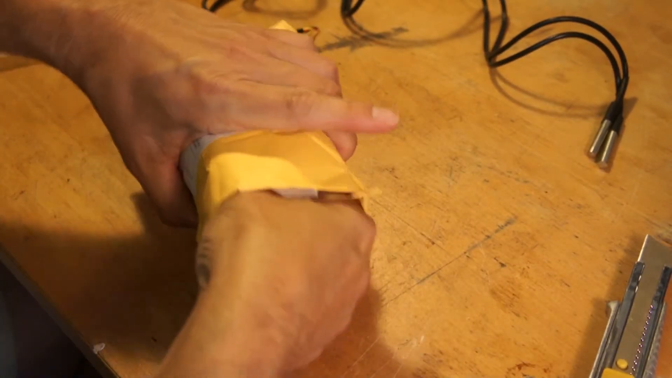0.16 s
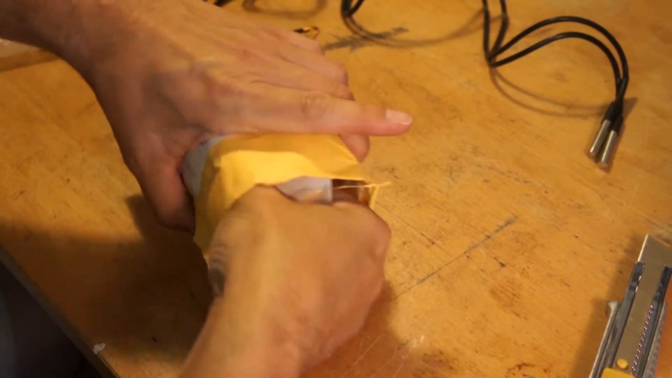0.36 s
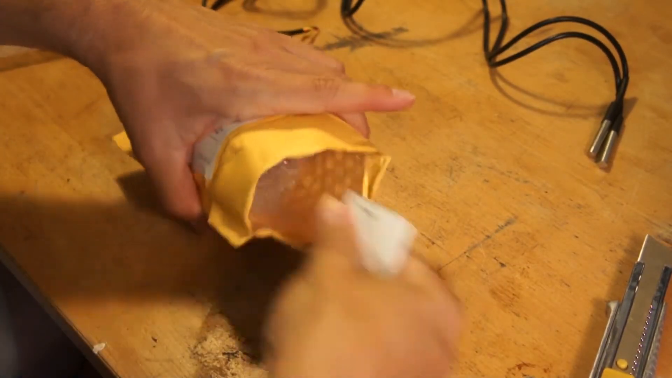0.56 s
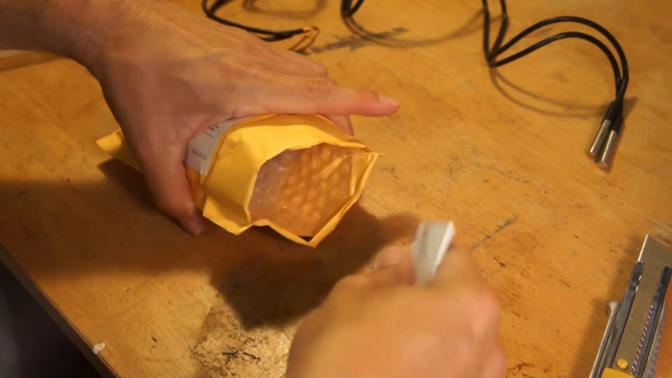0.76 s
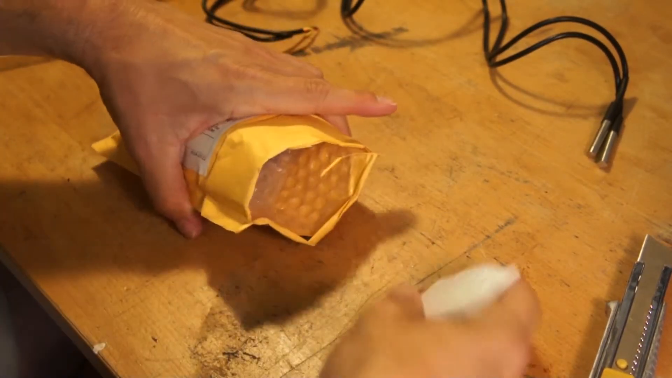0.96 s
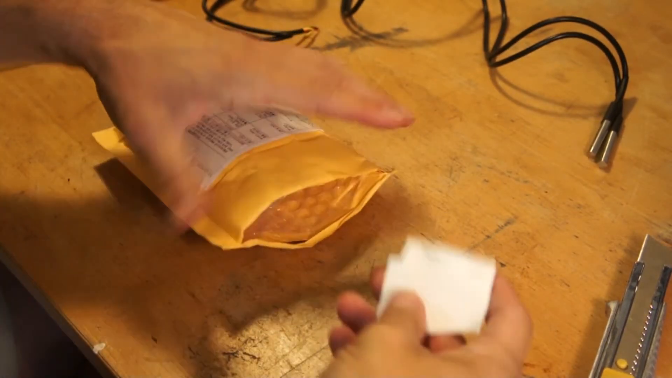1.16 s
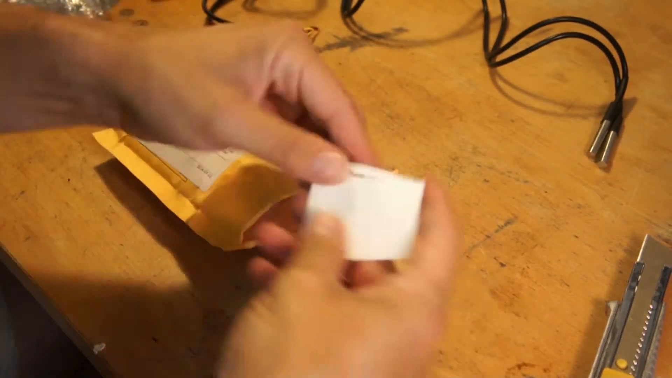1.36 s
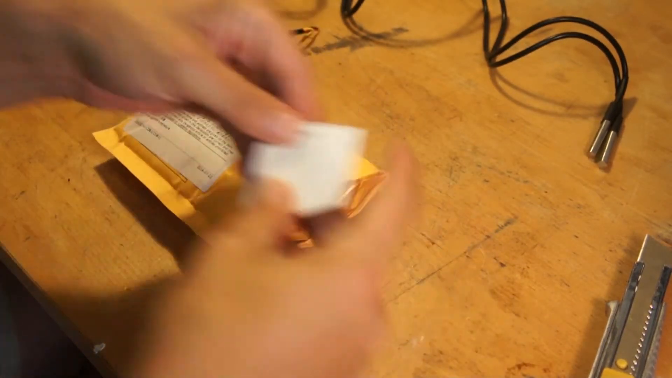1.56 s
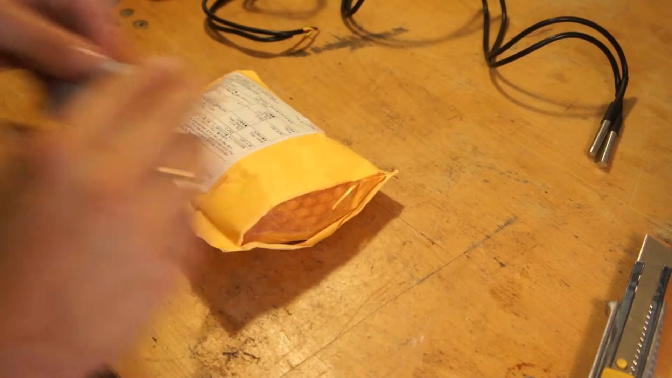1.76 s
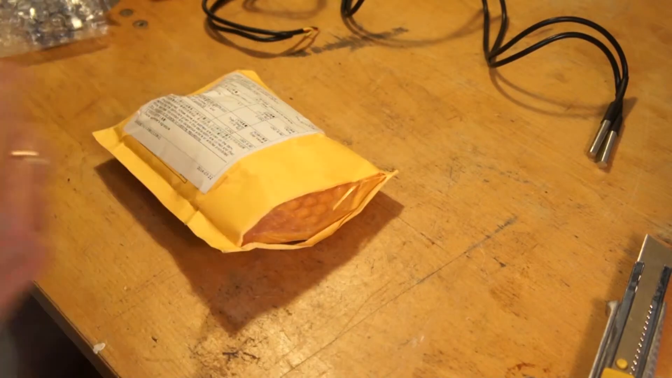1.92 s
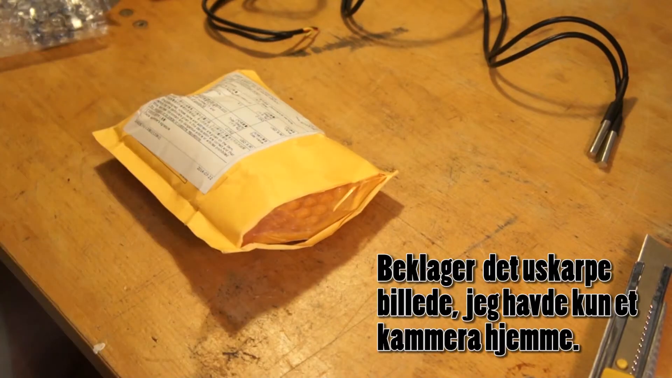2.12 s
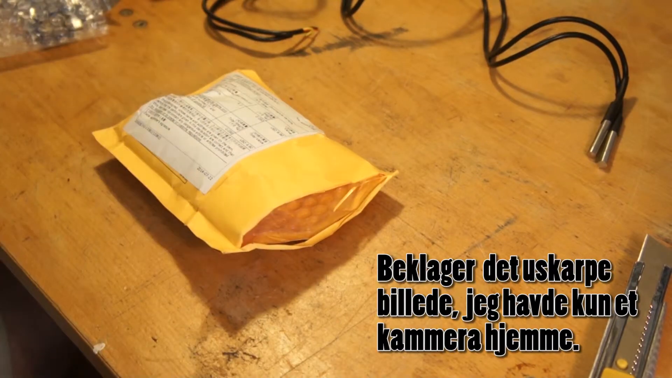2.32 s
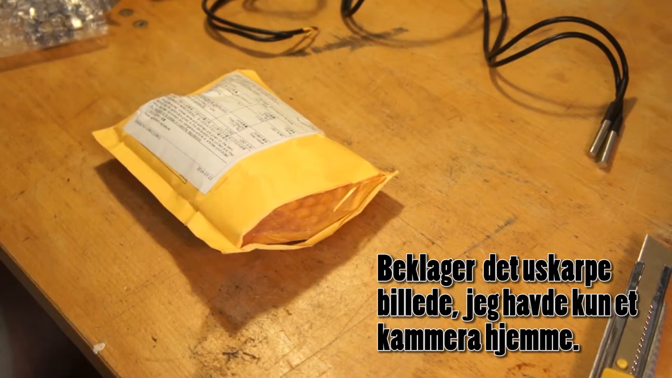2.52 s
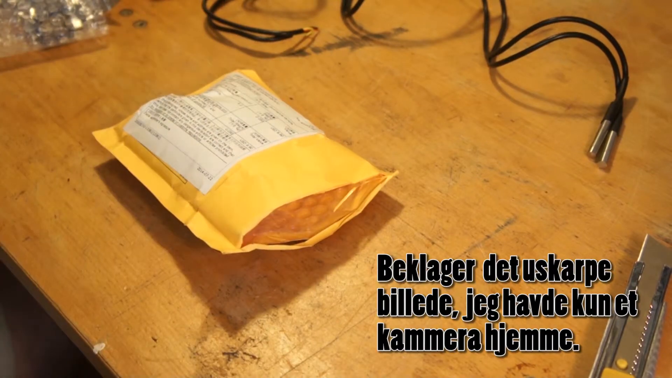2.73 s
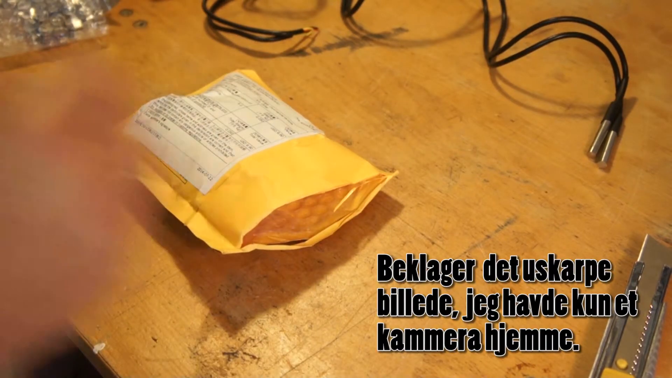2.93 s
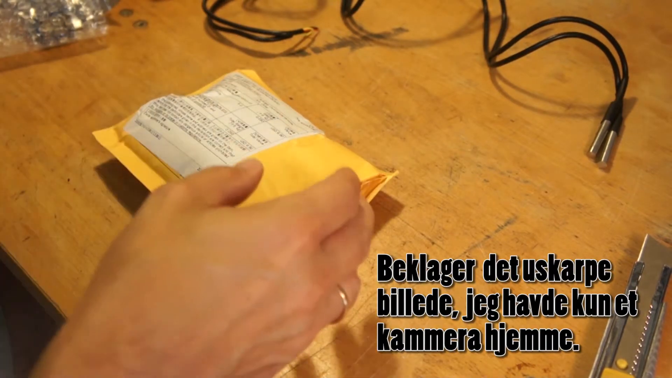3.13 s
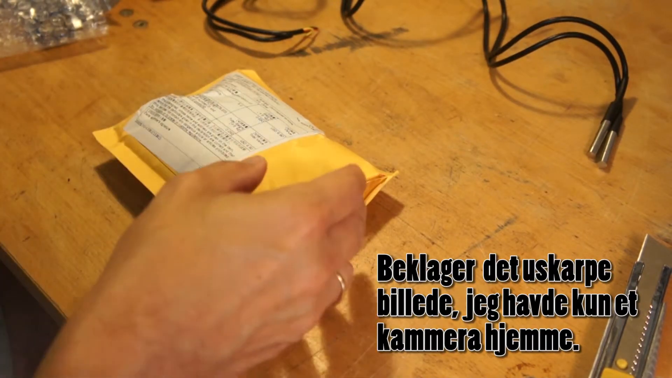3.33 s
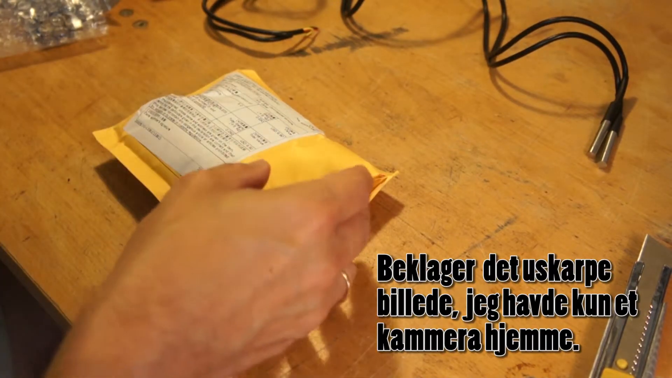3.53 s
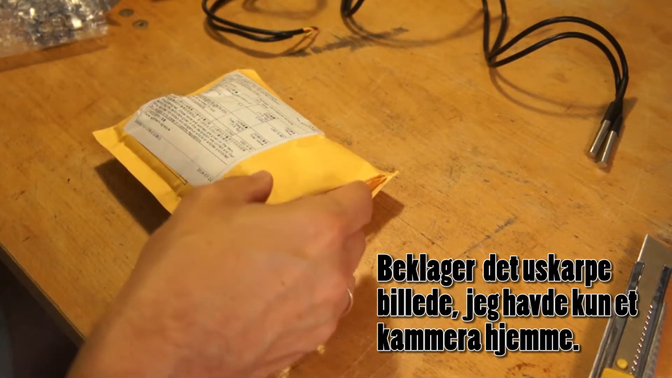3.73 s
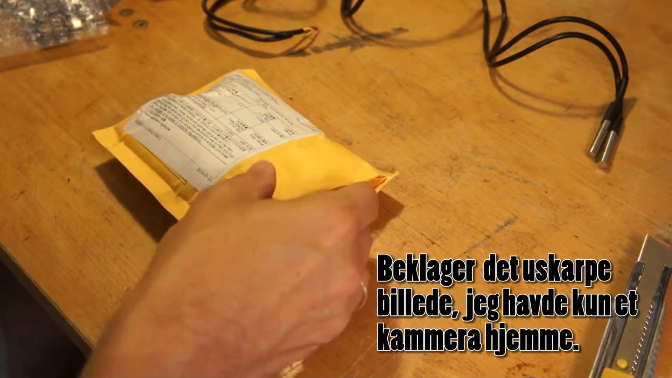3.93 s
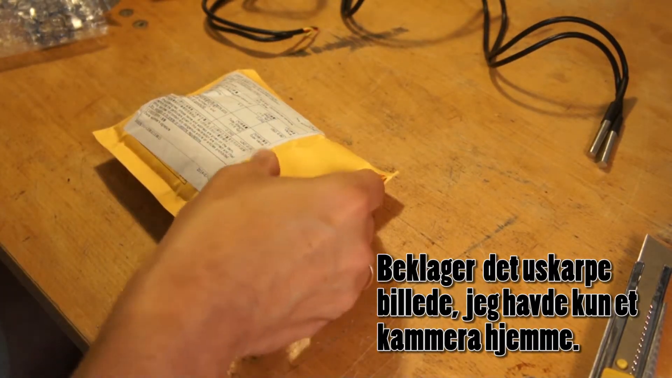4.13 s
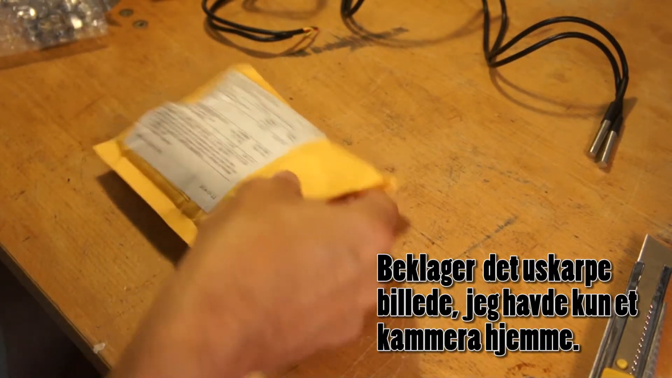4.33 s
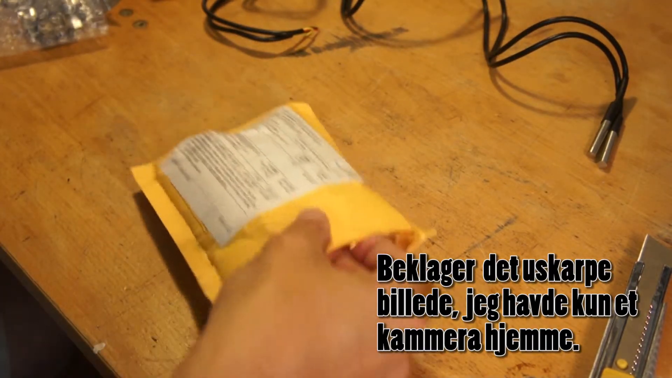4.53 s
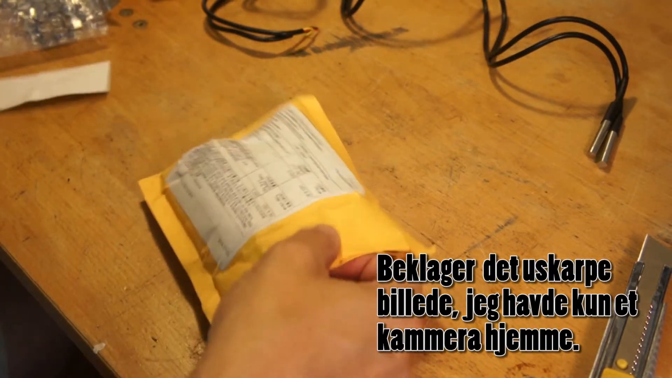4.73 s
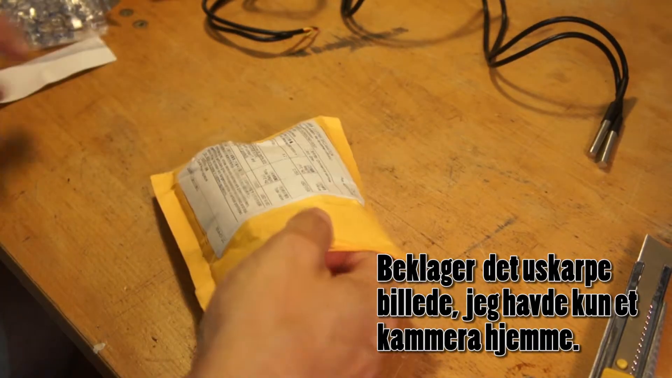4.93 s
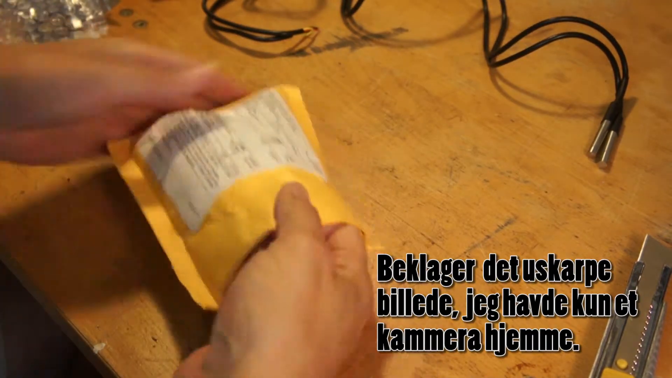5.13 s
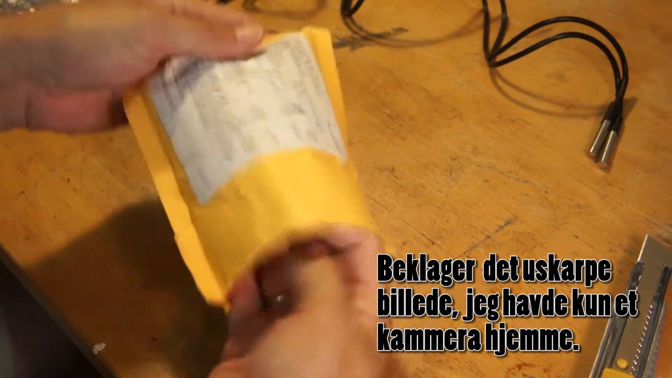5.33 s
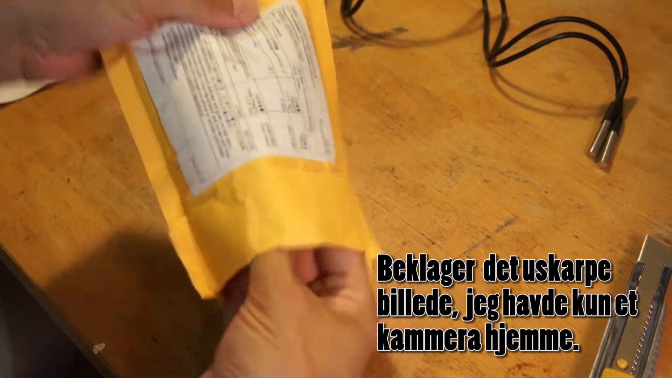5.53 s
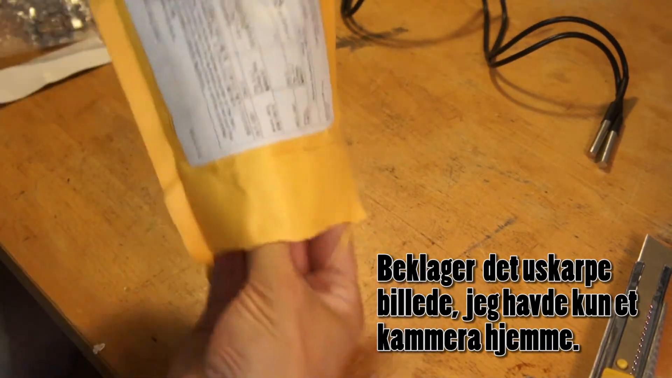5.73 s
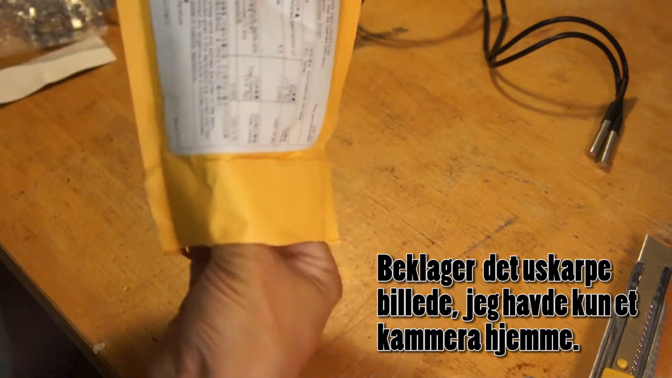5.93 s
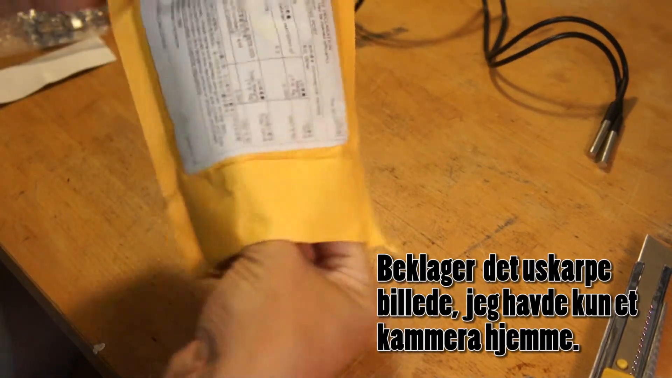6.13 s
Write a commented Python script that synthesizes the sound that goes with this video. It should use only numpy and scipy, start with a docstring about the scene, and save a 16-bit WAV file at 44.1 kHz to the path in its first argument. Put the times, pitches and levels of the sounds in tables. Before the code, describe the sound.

Close, dry paper rustling with sharp little snaps and soft bumps as a bubble-lined envelope is handled on a wooden bench.

```python
"""Paper rustles as a hand works a small packet out of a padded envelope on a wooden workbench.
The packet is tossed aside and lands with a knock; later the hand reaches back in and lifts the envelope.
Stick-slip friction of skin and bubble lining drives the resonances of the paper walls and the air inside.
The stiff walls buckle with dry snaps and the padding bumps softly; the small, fairly dead room hums."""
import sys
import numpy as np
from scipy import signal
from scipy.fft import rfft, irfft
from scipy.io import wavfile
from scipy.ndimage import uniform_filter1d

SR = 44100
rng = np.random.default_rng(int(sys.argv[2]) if len(sys.argv) > 2 else 0)


def master(y):
    """Save y as 16-bit WAV."""
    cut = np.clip(np.atleast_2d(y).T, -1, 1)
    pcm = np.round(cut * 32767)  # scale
    wavfile.write(sys.argv[1], SR, pcm.astype(np.int16))


N = 272097
TIME = np.arange(N) / SR
BURST_GAIN = np.sqrt(0.02 * SR)  # gives a burst of unit energy an rms of 1 over 20 ms


def from_db(db):
    """Amplitude grows tenfold for every 20 dB."""
    return 10 ** (np.asarray(db) / 20)


def unit_rms(x):
    """Division by the rms gives a signal unit mean power."""
    return x / np.sqrt(np.mean(x ** 2) + 1e-20)


def unit_energy(x):
    """Energy is the sum of squared samples; each channel is scaled to make it 1."""
    return x / np.sqrt(np.sum(x ** 2, axis=-1, keepdims=True) + 1e-20)


def at_bins(points, size):
    """Interpolation in log frequency carries (Hz, value) points onto the bins of a transform."""
    hz, value = np.transpose(points)
    return np.interp(np.log(np.fft.rfftfreq(size, 1 / SR) + 1e-9), np.log(hz), value)


def minimum_phase(gain):
    """Of all causal responses with these gains, the minimum-phase one delivers its energy earliest."""
    cepstrum = irfft(np.log(gain))
    half = len(cepstrum) // 2
    cepstrum[1:half] *= 2
    cepstrum[half + 1:] = 0
    return np.exp(rfft(cepstrum))


def whiten(burst, size=8192, smoothing_bins=121):
    """Inverse filtering levels a stereo burst's broad spectrum and keeps its fine ripple."""
    spectrum = rfft(burst, size)
    power = uniform_filter1d(np.mean(np.abs(spectrum) ** 2, axis=0), smoothing_bins)
    return irfft(spectrum * minimum_phase((power + 1e-9) ** -0.5))


def diffuse_noise(coherence, size):
    """A diffuse field is only partly correlated at two points: white noise, left and right."""
    correlation = np.clip(at_bins(coherence, size), -0.95, 0.95)
    mid, side = rfft(rng.standard_normal((2, size)))
    return irfft(np.sqrt(1 + correlation) * mid + np.sqrt(1 - correlation) * side * [[1], [-1]], size)


def room_background(air_db=-48):
    """Steady diffuse air noise is superposed on the pure tones of a faint electrical hum."""
    # Room air. Each row: frequency in Hz, relative spectral density in dB.
    air_spectrum = [(25, -33), (48, -27), (90, -10.5), (160, -6), (290, -3.5), (450, -7.5), (650, -8.5),
                    (1100, -12), (2300, -17), (5000, -24), (11500, -26), (13200, -50)]
    # Coherence of that noise. Each row: frequency in Hz, left-right correlation.
    air_coherence = [(60, 0.15), (130, 0.025), (290, -0.047), (640, -0.44), (3000, -0.34), (7000, -0.12)]
    # Hum. Each row: frequency in Hz, rms level in dB.
    hum_tones = [(61, -74), (184, -63), (258, -72.5), (426, -69)]
    noise = diffuse_noise(air_coherence, N)
    air = irfft(rfft(noise) * from_db(at_bins(air_spectrum, N)), N)
    hum = sum(np.sqrt(2) * from_db(db) * np.sin(2 * np.pi * (hz * TIME + rng.random()))
              for hz, db in hum_tones)
    return from_db(air_db) * unit_rms(air) + hum


def room_response(wet_db, t60_s, right_lag_s, late_db=-16, late_t60_s=0.34, build_s=0.0012, size=8192):
    """Direct sound comes first; reverberation builds up and dies away with a double slope."""
    # Coherence of the reverberation. Each row: frequency in Hz, left-right correlation.
    tail_coherence = [(100, 0.8), (600, 0.7), (1400, 0.22), (3000, 0.026), (12000, 0.061)]
    t = TIME[:size]
    direct = unit_energy(np.sinc((t - np.array([[0], [right_lag_s]])) * SR - 2))
    build = 1 - np.exp(-(t / build_s) ** 2)
    decay = from_db(-60 * t / t60_s) + from_db(late_db - 60 * t / late_t60_s)
    tail = unit_energy(diffuse_noise(tail_coherence, size) * decay * build)
    return unit_energy(direct + from_db(wet_db) * tail)


def moving_contact(sound, spots=7, hop_s=0.004):
    """Reflections depend on source position: the contact hops among spots, each with its own response."""
    hops = np.arange(0, TIME[-1], hop_s)
    visited = rng.integers(0, spots, len(hops))
    heard = 0
    for spot in range(spots):
        weight = np.sqrt(np.interp(TIME, hops, visited == spot))
        room = room_response(wet_db=8, t60_s=0.14, right_lag_s=0.00009)
        heard = heard + signal.oaconvolve((sound * weight)[None], room, axes=1)[:, :N]
    return heard


def small_radiator(motion, corner_hz):
    """A source much smaller than the wavelength radiates poorly, so the bass falls away."""
    return signal.sosfilt(signal.butter(2, corner_hz, "high", fs=SR, output="sos"), motion)


def body_response(spectrum, resonances=(), size=2048):
    """A linear body's impulse response follows from its broad spectrum and its narrow peaks and dips."""
    hz, db = np.fft.rfftfreq(size, 1 / SR), at_bins(spectrum, size)
    for centre_hz, width_hz, gain_db in resonances:
        db = db + gain_db / (1 + (2 * (hz - centre_hz) / width_hz) ** 2)
    return unit_energy(irfft(minimum_phase(from_db(db))))


def envelope_responses():
    """Cavity and panel modes depend on support: pouch, paper and hiss responses, lying and then held."""
    # Low pouch, mid paper and high hiss. Each row: frequency in Hz, relative spectral density in dB.
    pouch = [(90, -50), (200, -8.5), (330, -6), (480, -3.5), (750, -1.5), (1000, -4), (1300, -16.5),
             (2400, -59.5)]
    paper = [(500, -26.5), (900, -0.5), (1150, 1), (1900, 2), (2700, -0.5), (3300, -3.5), (4300, -15.5),
             (7000, -52.5)]
    hiss = [(1700, -35), (2800, 0.5), (3600, 0), (5000, 1), (6300, 0), (8200, 0.5), (10000, -2),
            (11500, -5), (12350, -13), (13200, -73)]
    # Modes of the enclosed air and the paper walls, on the bench and held up with the hand inside.
    # Each row: centre in Hz, width in Hz, gain in dB.
    cavity_lying = [(386, 26, 7.5), (659, 81, 5), (788, 24, 10.5), (843, 71, -4.5)]
    panels_lying = [(1020, 60, 0.5), (1155, 26, 3.5), (1280, 20, 6.5), (1424, 99, 0.5), (1930, 56, 4),
                    (2380, 120, 1)]
    cavity_held = [(382, 56, 5.5), (465, 50, 1.5), (660, 47, 3.5), (780, 34, 9.5), (930, 330, -5.5)]
    panels_held = [(1100, 99, -3.5), (1410, 42, 0.5), (1970, 200, 3), (2250, 57, -1), (2850, 66, -1)]
    return [np.array([body_response(pouch, cavity), body_response(paper, panels), body_response(hiss)])
            for cavity, panels in ((cavity_lying, panels_lying), (cavity_held, panels_held))]


def lifted(time_s, midpoint_s=5.3, length_s=0.076):
    """The envelope's support passes linearly from the bench (0) to the hand (1)."""
    return np.clip((time_s - midpoint_s) / length_s + 0.5, 0, 1)


def padded_bumps(contact_s=0.001, t60_s=0.025, size=8192):
    """A soft impact sets the padded pouch swinging for a few cycles as a damped oscillator."""
    # Contacts of hand, padding and bench. Each row: start in seconds, level in dB, frequency in Hz.
    bumps = [(0.614, -46.5, 225), (1.96, -43, 397), (5.124, -41, 364), (5.195, -47, 212), (5.262, -46, 307),
             (5.448, -38, 484), (5.936, -41, 250), (5.945, -43, 392)]
    motion, t = np.zeros(N + size), TIME[:size]
    shape = (1 - np.exp(-t / contact_s)) * from_db(-60 * t / t60_s)
    for start_s, db, hz in bumps:
        start = int(start_s * SR)
        swing = unit_energy(shape * np.sin(2 * np.pi * hz * t))
        motion[start:start + size] += BURST_GAIN * from_db(db) * swing
    room = whiten(room_response(wet_db=-3, t60_s=0.14, right_lag_s=0.00004))
    return signal.oaconvolve(small_radiator(motion, corner_hz=150)[None], room, axes=1)[:, :N]


def stick_slip(per_s, spread_db, smooth_share):
    """Stick-slip friction is a random train of uneven impulses over smooth noise, with an rms near 1."""
    sizes = from_db(spread_db * np.minimum(rng.exponential(1, N), 4)) * rng.choice([-1, 1], N)
    catches = unit_rms(sizes * (rng.random(N) < per_s / SR))
    return np.sqrt(1 - smooth_share) * catches + np.sqrt(smooth_share) * rng.standard_normal(N)


def swell(start_s, length_s, attack_s=0.029, release_s=0.032):
    """Amplitude grows exponentially up to the start, holds for the length and then decays."""
    early = np.maximum(start_s - TIME, 0)
    late = np.maximum(TIME - start_s - length_s, 0)
    return np.exp(-np.minimum(early / attack_s + late / release_s, 20))


def finger_scrapes(q=11.5):
    """Skin sticks and slips on taut paper; the resonance of one small patch gives each scrape a pitch."""
    # Fingertip or nail. Each row: start in seconds, length in seconds, level in dB, pitch in Hz.
    scrapes = [(0.016, 0.05, -43.5, 976), (0.295, 0.042, -51, 1970), (3.54, 0.031, -51, 5160),
               (4.43, 0.04, -49, 1390), (4.59, 0.03, -56, 1645), (5.607, 0.054, -47, 2270)]
    sound = np.zeros(N)
    for start_s, length_s, db, hz in scrapes:
        b, a = signal.iirpeak(hz, q, fs=SR)
        friction = stick_slip(per_s=900, spread_db=3.8, smooth_share=0.2)
        patch = signal.lfilter(b, a, signal.lfilter(b, a, friction))
        sound += from_db(db) * swell(start_s, length_s) * unit_rms(patch)
    return sound


def paper_rustle(lying, held, grip_pouch_db=-4, grip_hiss_db=4, trim_db=-0.69):
    """Friction forces the walls to vibrate: coarse catches shake the pouch, fine ones hiss, creases tick."""
    # Swells of paper rustle: pushes and pulls, and faint settling while the envelope lies untouched.
    # Each row: start in seconds, length in seconds, paper level in dB, pouch and hiss over paper in dB.
    swells = [(0.008, 0.067, -38, -2, 6), (0.191, 0.057, -43, -5, 5), (0.305, 0.043, -48.5, 0.5, 3.5),
              (0.468, 0.1, -43, -6.5, 6), (1.063, 0.067, -48, -4, 4), (1.423, 0.0078, -54.5, 0, 11),
              (1.526, 0.0075, -60.5, -11, 15.5), (1.773, 0.018, -55.5, -10, 8),
              (1.88, 0.083, -55, -12, 10.5), (2.022, 0.3, -66.5, 6, 9.5), (2.348, 0.24, -55.5, 1, 1.5),
              (3.509, 0.11, -51.5, -0.5, 2), (3.942, 0.085, -48, -4, -4), (4.14, 0.033, -62, -10, 15),
              (4.27, 0.026, -52, 1.5, -6), (4.387, 0.11, -46.5, -9.5, -0.5), (4.54, 0.079, -48.5, -14, -19),
              (4.738, 0.21, -48.5, -3, 1), (5.168, 0.1, -47, 0, 1.5), (5.325, 0.016, -43.5, -11, 9.5),
              (5.443, 0.062, -37, -4, 4.5), (5.586, 0.14, -43.5, -11, 3), (5.866, 0.08, -41, 3.5, 3.5),
              (5.921, 0.036, -42.5, -14, 9), (5.998, 0.066, -44, -7, -3.5), (6.138, 0.03, -47, -9, 5.5)]
    # Light rustle under a resting hand. Each row: start in seconds, length in seconds, paper level in dB.
    grips = [(0, 0.42, -55), (1.045, 0.95, -68), (3.86, 0.27, -62.5), (4.186, 0.48, -53.5), (4.783, 1, -50),
             (5.85, 0.22, -48.5)]
    rustles = swells + [(*grip, grip_pouch_db, grip_hiss_db) for grip in grips]
    power = np.zeros((3, N))
    for start_s, length_s, db, pouch_db, hiss_db in rustles:
        power += (from_db([[db + pouch_db], [db], [db + hiss_db]]) * swell(start_s, length_s)) ** 2
    lift = lifted(TIME)
    crinkle_db = -9.5 + 1.5 * lift  # creases tick louder with the hand inside
    crinkles = from_db(crinkle_db) * stick_slip(per_s=45, spread_db=4.3, smooth_share=0)
    pouch_drive = stick_slip(per_s=700, spread_db=3.1, smooth_share=0.36)
    paper_drive = stick_slip(per_s=700, spread_db=6.2, smooth_share=0.42) + crinkles
    hiss_drive = stick_slip(per_s=2000, spread_db=6.8, smooth_share=0.3) + crinkles
    force = np.array([pouch_drive, paper_drive, hiss_drive]) * np.sqrt(power)
    rustle = sum(signal.oaconvolve(force * share, bodies, axes=1)[:, :N].sum(axis=0)
                 for share, bodies in ((1 - lift, lying), (lift, held)))
    return from_db(trim_db) * moving_contact(rustle + finger_scrapes())


def impulsive_force(length_s, jump_db, lead, flicks_per_s=5000, rise_ratio=0.44, size=2048):
    """Buckling or impact is impulsive: flicks gather, the force jumps at sample lead, flicks die away."""
    t = (np.arange(size) - lead) / SR
    flicks = rng.standard_normal(size) * (rng.random(size) < flicks_per_s / SR)
    force = unit_energy(flicks * np.exp(-np.maximum(t, -t / rise_ratio) / length_s))
    force[lead] += from_db(jump_db)
    return force


def local_resonance(burst, hz, ring_db, q=3.7):
    """The part that moves is a small resonator: it radiates little bass and rings briefly."""
    radiated = small_radiator(burst, corner_hz=min(464, 0.39 * hz))
    return radiated + from_db(ring_db) * signal.lfilter(*signal.iirpeak(hz, q, fs=SR), radiated)


def snaps_and_knocks(lying, held, sharp_s=0.00099, quick_s=0.0002, crack_db=-25, lead=400, size=8192):
    """Buckling and impacts release energy in short bursts that excite pouch, paper and hiss."""
    # Dry snaps and knocks: creases giving way, the packet landing, light contacts.
    # Each row: time in seconds, pouch, paper and hiss levels in dB, ring pitch in Hz,
    # ring strength in dB, decay time of the flicks in seconds, left over right in dB.
    events = [(0.4537, -35, -33.5, -36, 1100, -5, 0.00097, 0.5),
              (0.4605, -42, -34.5, -45, 900, 2, 0.0041, -5), (0.57, -40, -45, -36.5, 650, -4, 0.0011, 3),
              (0.5804, -41, -34.5, -29, 4550, -27, 0.0048, 0), (0.584, -41, -35.5, -43, 1850, 1, 0.0051, 0),
              (0.6114, -37.5, -44, -50, 830, 18, 0.004, 0), (1.356, -71, -60, -48, 5630, -17, 0.00051, 3),
              (1.8487, -46, -37, -43, 3030, 7, 0.001, 2), (1.886, -39, -32, -32, 2300, -2, 0.0022, 1.5),
              (1.9587, -54, -39, -30, 4430, 5, 0.001, 1), (1.9592, -35.5, -55, -60, 660, -1, 0.00028, 1),
              (1.9604, -65, -37, -43, 2010, 18, 0.0015, 0), (2.449, -48, -59, -49.5, 5970, -8, 0.00057, 6),
              (2.491, -65, -55, -46, 7750, -2, 0.0013, 5.5), (3.872, -47, -48, -52, 1400, 0, 0.0063, -3),
              (3.881, -39.5, -39.5, -47, 1000, 15, 0.0005, 4),
              (3.8862, -41.5, -38, -60, 526, 10, 0.005, -1),
              (4.0263, -51, -54, -34.5, 8250, 11, 0.00073, 4.5),
              (4.07, -56, -48.5, -49, 7000, -7, 0.0016, 0), (4.174, -66, -53, -43, 4450, 0, 0.0019, 2),
              (4.222, -45, -45, -48, 950, 6, 0.0059, -1), (4.283, -48, -43, -43.5, 1210, 21, 0.0067, 1),
              (4.441, -46, -41.5, -50, 1380, 11, 0.0012, 0), (4.4477, -56, -43, -56, 1400, 20, 0.002, -4),
              (4.547, -56, -64, -43.5, 9500, 4, 0.0012, -1), (4.688, -43.5, -49, -49, 590, 5, 0.0023, -1),
              (4.714, -49.5, -45.5, -41, 9000, -3, 0.0041, 0), (4.766, -47, -41.5, -33, 2200, 7, 0.0033, 2),
              (4.961, -50, -48, -37.5, 9700, 7, 0.0075, -1), (4.9756, -26, -25, -39, 730, 7, 0.00088, -1.5),
              (4.984, -41, -33, -39, 1410, 2, 0.0025, -2), (5.083, -45, -38.5, -40, 1340, 1, 0.0039, -2),
              (5.1218, -34.5, -54, -48, 780, -13, 0.001, 1),
              (5.178, -54, -42.5, -43.5, 2970, 19, 0.005, -4), (5.261, -41, -34, -33, 1620, -4, 0.022, 0),
              (5.3377, -39, -25, -27, 1460, -16, 0.0033, -1), (5.3395, -33, -46, -50, 790, 16, 0.0025, 2),
              (5.427, -49, -59, -43, 7500, 4, 0.0017, 11), (5.447, -28, -20, -23, 2300, 5, 0.00032, 0.5),
              (5.4486, -26.5, -52, -47, 564, 1.5, 0.00036, 1),
              (5.6144, -39.5, -39.5, -54, 614, 13, 0.0026, 1),
              (5.7073, -35, -34.5, -39.5, 500, 3, 0.0015, -2), (5.762, -43, -41, -34, 9100, 8, 0.0014, 0),
              (5.8307, -32.5, -33.5, -60, 1770, 16, 0.002, -2.5),
              (5.8368, -45, -34, -60, 1280, 17, 0.0019, -2), (5.934, -38, -35.5, -45, 2400, 0, 0.005, -1),
              (6.152, -57, -63, -43.5, 8000, 0, 0.0023, 0)]
    sound = np.zeros((2, N + size))
    for time_s, pouch_db, paper_db, hiss_db, ring_hz, ring_db, length_s, pan_db in events:
        bodies = lying + lifted(time_s) * (held - lying)
        # A slower burst has a weaker jump and more reverberation.
        doublings = np.log2(length_s / sharp_s)
        jump_db = 1 - 0.5 * doublings
        force = impulsive_force(length_s, jump_db, lead)
        room = room_response(wet_db=1 + 2 * doublings, t60_s=0.085, right_lag_s=0.00004)
        burst = whiten(signal.fftconvolve(force[None], room, axes=1))
        pitched = local_resonance(burst, ring_hz, ring_db)
        start = int(time_s * SR) - lead
        side_db = np.array([[pan_db], [-pan_db]]) / 2
        for db, body in zip((pouch_db, paper_db, hiss_db), bodies):
            ring = unit_energy(signal.fftconvolve(pitched, body[None], axes=1)[:, :size])
            sound[:, start:start + size] += BURST_GAIN * ring * from_db(db + side_db)
        # A bare crack reaches above the hiss band; the quicker the burst, the stronger it is.
        quickness = min(quick_s / length_s, 1)
        sound[:, start + lead + 2] += BURST_GAIN * quickness * from_db(hiss_db + crack_db + min(jump_db, 0))
    return sound[:, :N]


def scene():
    """Sound pressures superpose: rustle, snaps, knocks and bumps add to the room's background."""
    lying, held = envelope_responses()
    return paper_rustle(lying, held) + snaps_and_knocks(lying, held) + padded_bumps() + room_background()


def record(dry):
    """Clipping limits peaks to full scale, and a steep low-pass removes the highest treble."""
    low_pass = signal.ellip(10, 0.1, 70, 16500, fs=SR, output="sos")
    return signal.sosfilt(low_pass, np.clip(dry, -1, 1))


dry = scene()
out = record(dry)
master(out)
```